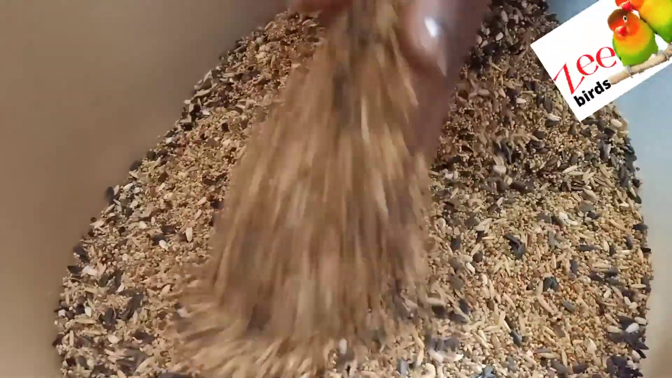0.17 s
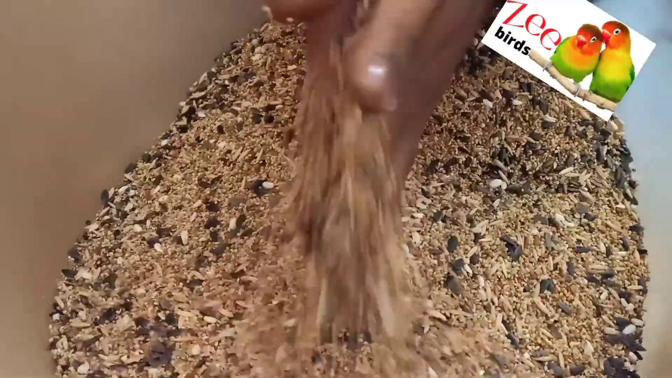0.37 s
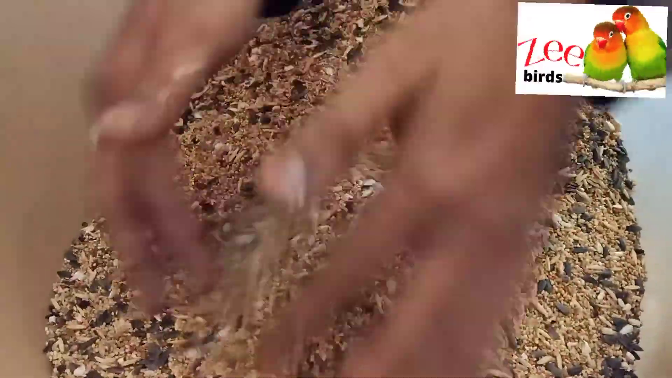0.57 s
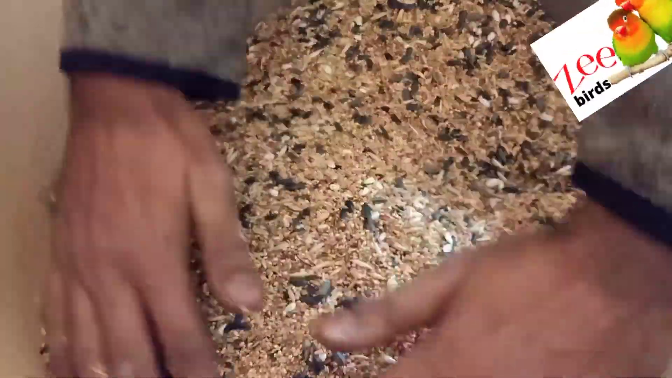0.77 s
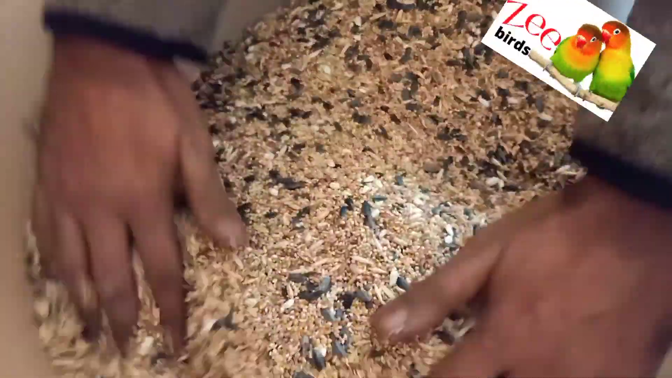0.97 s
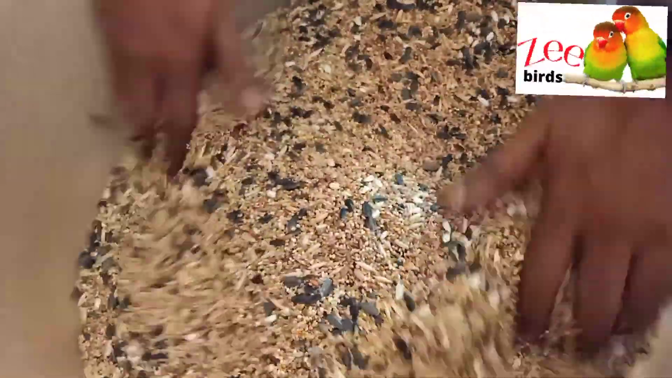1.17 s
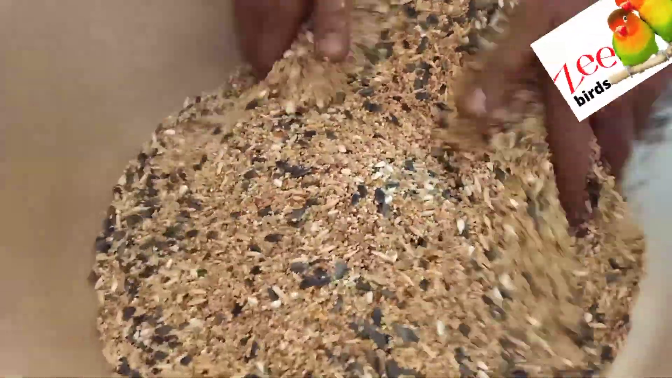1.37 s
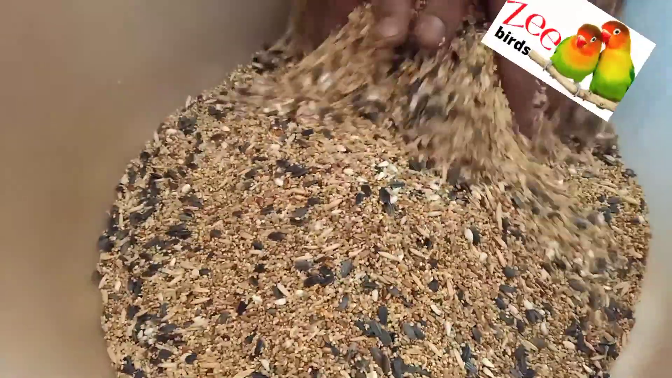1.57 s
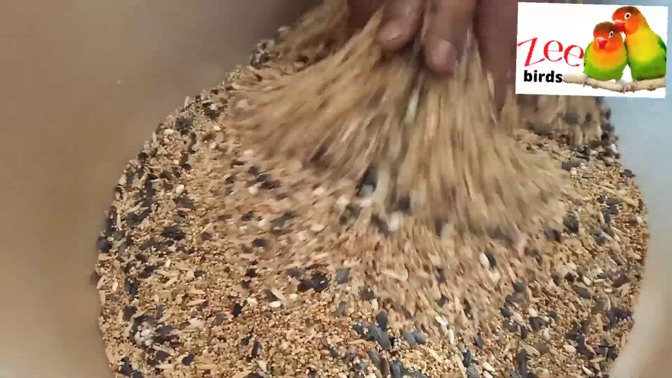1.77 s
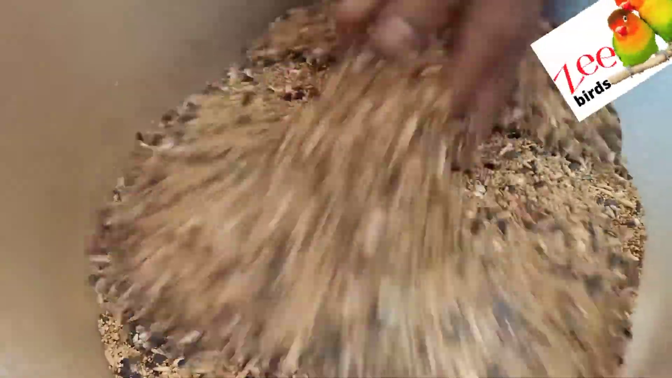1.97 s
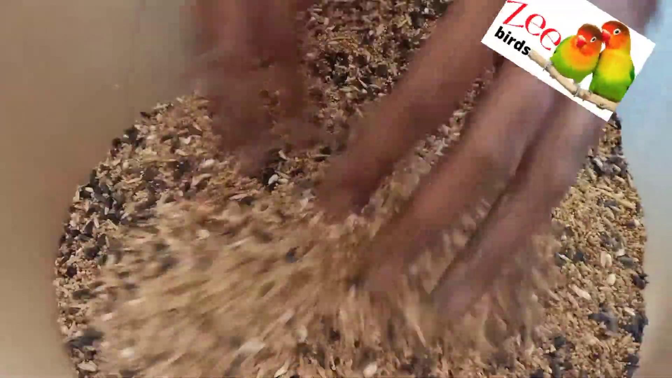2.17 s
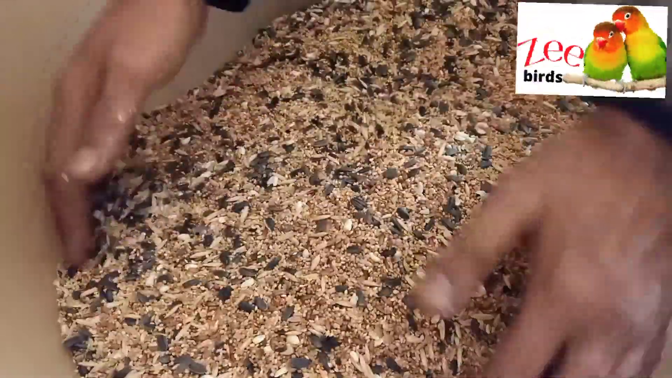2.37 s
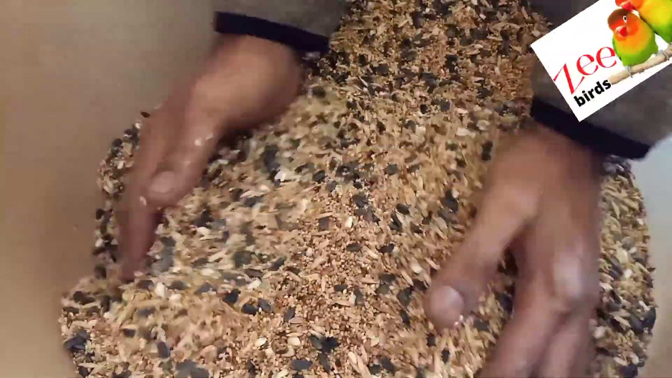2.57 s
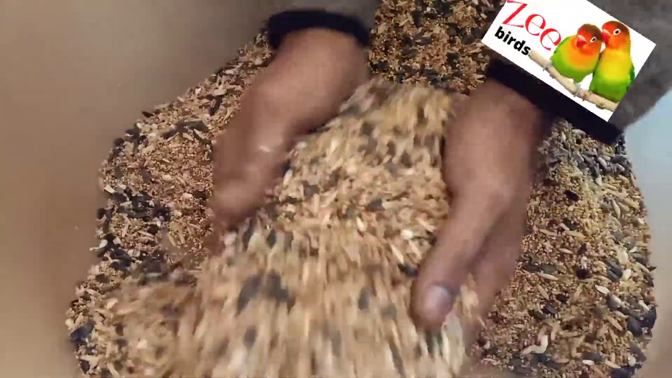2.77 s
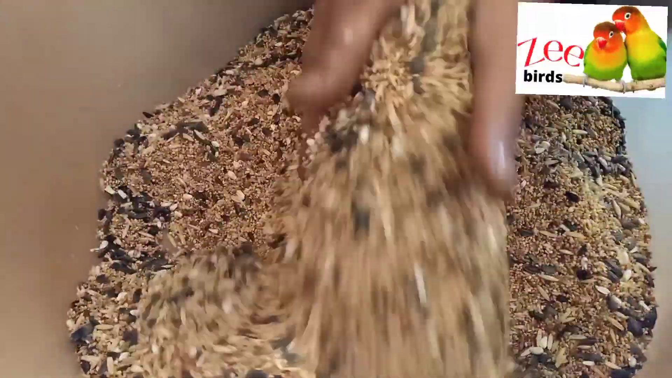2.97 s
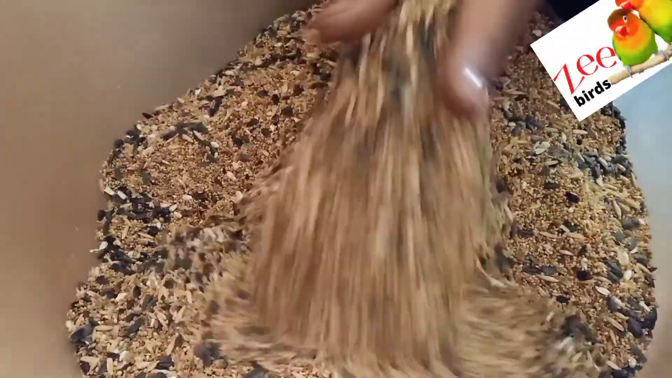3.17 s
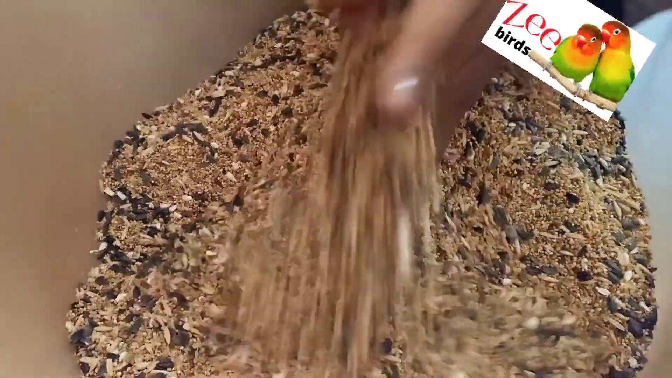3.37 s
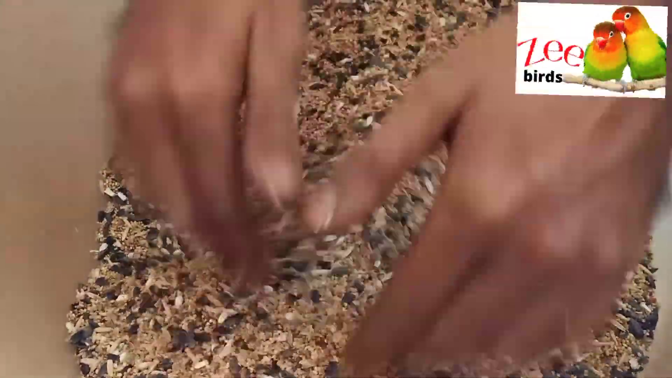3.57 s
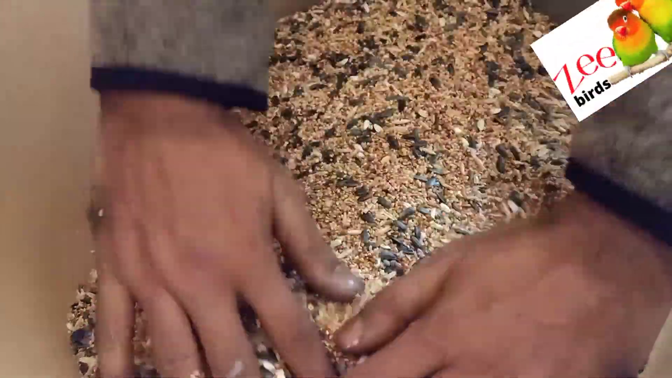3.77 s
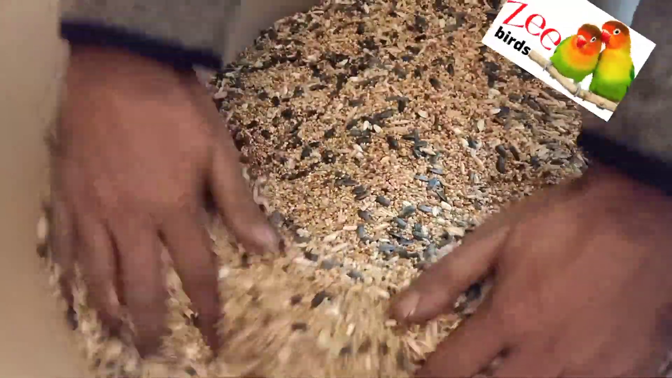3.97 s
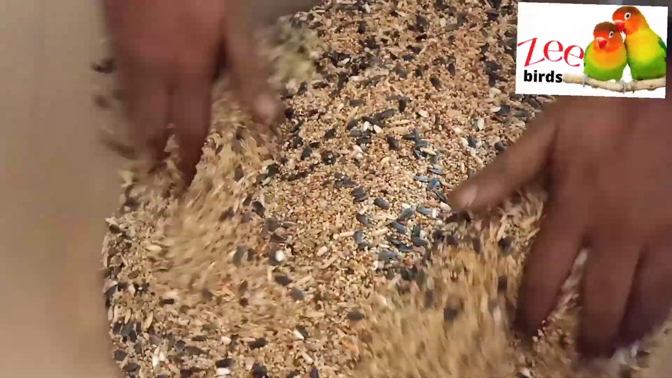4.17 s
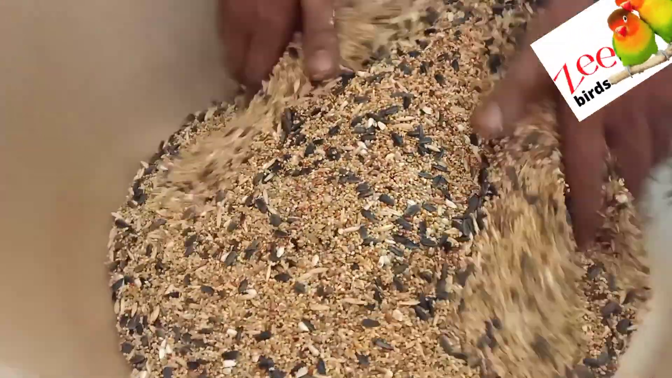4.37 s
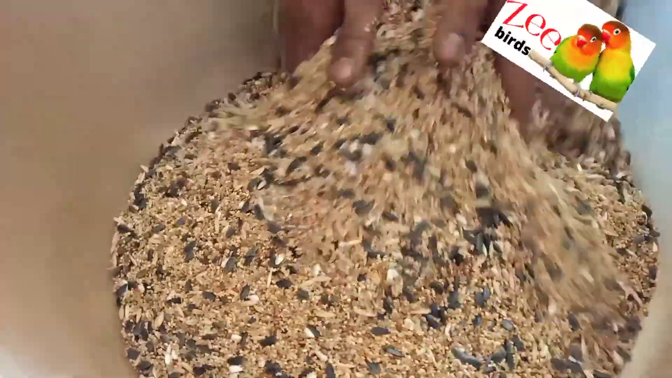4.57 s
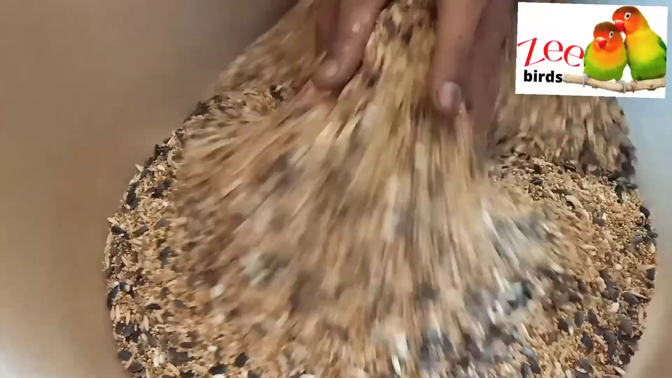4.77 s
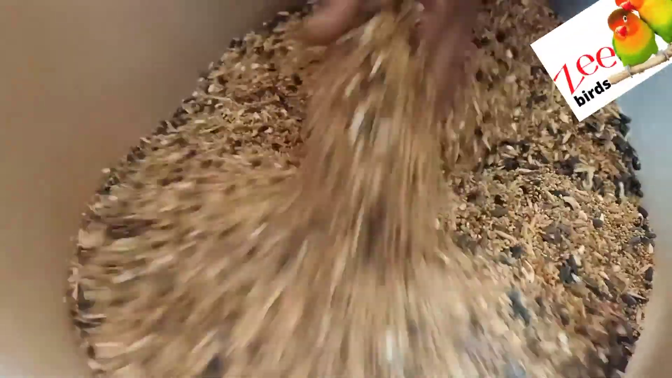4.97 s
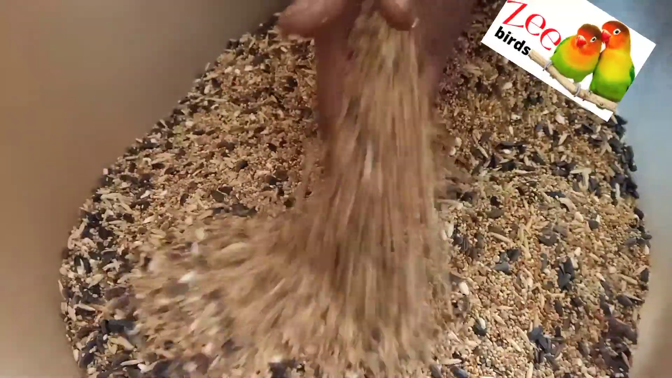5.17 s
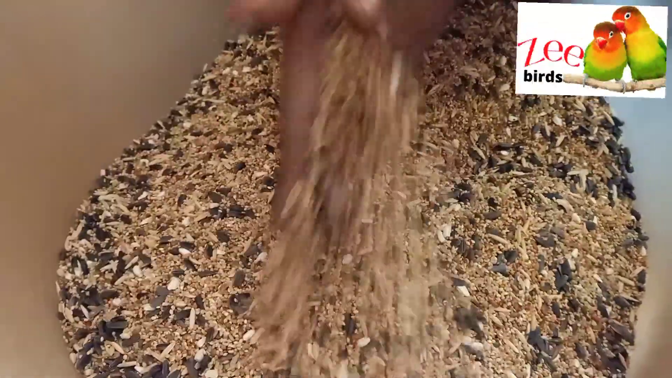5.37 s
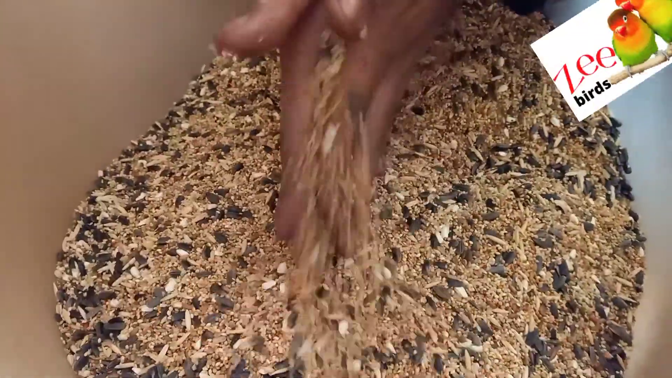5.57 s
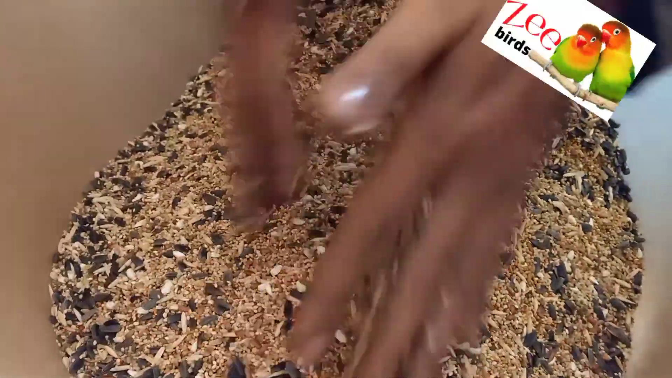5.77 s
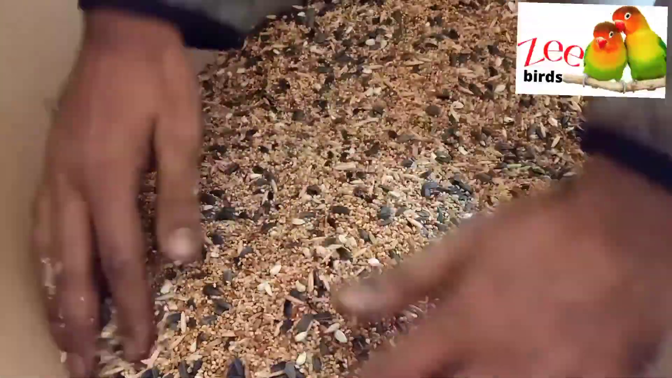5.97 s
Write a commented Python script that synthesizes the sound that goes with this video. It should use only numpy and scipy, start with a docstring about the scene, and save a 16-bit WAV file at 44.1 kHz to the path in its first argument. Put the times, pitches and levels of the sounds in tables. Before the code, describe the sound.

Small oily seeds are mixed by hand in a plastic tub, heard close up in a quiet room with a low hum. Three rounds of digging each begin with dull fingertip jabs, swell into a gritty crunch and end in a fine pattering pour. Husks swish over the palms, single seeds tick and clumps land with sharp clacks, while the tub adds a slight hollow ring.

```python
"""Scooping birdseed in a plastic tub

Two hands scoop oiled birdseed three times, close by. The fingers jab into the heap, plough
through it with a dense crunch, and lift a load that pours back in a fine patter; clumps drop
as the hands open. Crunch and patter are thousands of tiny clicks of single seeds.
The hollow tub rings and echoes, and a quiet room hums underneath."""
import sys
import numpy as np
from scipy import signal
from scipy.fft import rfft, irfft
from scipy.io import wavfile
from scipy.ndimage import uniform_filter1d

SR = 44100
rng = np.random.default_rng(int(sys.argv[2]) if len(sys.argv) > 2 else 0)


def transcribe(signal):
    """Save signal, clipped to [-1, 1], as a 16-bit WAV file at the path in sys.argv[1]."""
    frames = np.atleast_2d(signal).T
    limited = np.clip(frames, -1, 1)
    pcm = np.round(limited * 32767).astype(np.int16)
    wavfile.write(sys.argv[1], SR, pcm)


N = 264996
TIME = np.arange(N) / SR

# tone colour of a clump or a large seed striking the heap: frequency_hz, level_db
CLACK_COLOUR = [(200, -43), (750, -16), (1200, 2), (1700, 0), (2400, 4), (4500, -16.5), (6400, 1.5),
                (9500, -29.5), (15500, -32)]


def amp(db):
    """Turns decibels into a gain to multiply by."""
    return 10 ** (np.asarray(db) / 20)


def unit_power(x):
    """Scales a signal to an average power of one."""
    return x / np.sqrt(np.mean(x ** 2) + 1e-20)


def curve_at(points, hz):
    """Reads between the points of a curve of (frequency, value) pairs."""
    point_hz, value = np.transpose(points)
    return np.interp(np.log(hz + 1), np.log(point_hz + 1), value)


def add_at(mix, start_s, sound):
    """Adds a short sound to the mix at the given time."""
    part = mix[:, max(round(start_s * SR), 0):][:, :sound.shape[1]]
    part += sound[:, :part.shape[1]]


def coloured(x, colour, size=4096):
    """Gives a sound a tone colour. The filter never rings early, so clicks keep their sharp fronts."""
    log_gain = np.log(amp(curve_at(colour, abs(np.fft.fftfreq(size, 1 / SR)))))
    taps = np.fft.ifft(np.exp(signal.hilbert(log_gain).conj())).real[:size // 2]
    return signal.oaconvolve(x, taps[None], axes=1)[:, :x.shape[1]]


def brightened(x, bright_db, shares, patchy_db=0.35):
    """Moves the treble over time: each frequency takes its share of bright_db and wanders a little."""
    hz, t, spectrum = signal.stft(x, SR, nperseg=256)
    patches = uniform_filter1d(rng.standard_normal(spectrum.shape), size=3, axis=0)
    patches = unit_power(uniform_filter1d(patches, size=20, axis=1))
    change_db = curve_at(shares, hz)[:, None] * np.interp(t, TIME, bright_db) + patchy_db * patches
    return signal.istft(spectrum * amp(change_db), SR, nperseg=256)[1][:, :N]


def swell(peak_s, level_db, half_length_s):
    """The gain of a short movement: it rises and fades smoothly."""
    return amp(level_db) * np.exp(-np.minimum(((TIME - peak_s) / half_length_s) ** 2 / 2, 20))


def swelling_clicks(swells, colour, clicks):
    """Coloured clicks that rise and fade with each listed swell."""
    return sum(swell(*row) for row in swells) * unit_power(coloured(clicks, colour))


def held(start_s, length_s, rise_s, sag_db_per_s, stop_db_per_s):
    """The gain of a long movement: it rises, sags slowly, and dies away after length_s."""
    age = np.maximum(TIME - start_s, 0)
    fade_db = -sag_db_per_s * age - stop_db_per_s * np.maximum(age - length_s, 0)
    return np.minimum(age / rise_s, 1) * amp(fade_db)


def joined(movements):
    """Joins (gain, brightness) pairs: powers add, and the loudest counts most for the brightness."""
    power = sum(gain ** 2 for gain, _ in movements) + 1e-14
    return np.sqrt(power), sum(gain ** 2 * bright_db for gain, bright_db in movements) / power


def seed_clicks(per_s, spread_db, lag_s):
    """Clicks of single seeds; each lies elsewhere, so left and right hear it at different times."""
    chance = np.clip(per_s / SR, 1e-4, 1) * np.ones(N)
    size, place, side = rng.standard_normal((3, N))
    strength = rng.choice([-1, 1], N) * amp(spread_db * np.minimum(size, 2.5))
    clicks = strength * (rng.random(N) < chance) / np.sqrt(chance)
    right_arrival = (np.arange(N) + np.round(place * lag_s * SR).astype(int)) % N
    right = np.bincount(right_arrival, clicks * amp(-side), N)
    return unit_power(np.array([clicks * amp(side), right]))


def avalanches(rate_hz, depth_db):
    """Seeds give way in small slides: a random gain that moves up to about rate_hz times a second."""
    hz = np.fft.rfftfreq(N, 1 / SR)
    wander = irfft(rfft(rng.standard_normal(N)) / (1 + (hz / rate_hz) ** 2), N)
    return unit_power(amp(depth_db * unit_power(wander)))


def hum_and_hiss(hum_db=-70.5, hiss_db=-65.5, stereo_width=0.25):
    """The room's low steady noise, nearly the same on both sides, and each microphone's own hiss."""
    # tone colours of the room and of the hiss: frequency_hz, level_db
    hum_colour = [(20, -5), (36, -16), (50, 7), (68, -11), (95, 0), (135, 5), (200, 2.5), (250, -18),
                  (295, -6), (480, -9), (800, -9.5), (2000, -36)]
    hiss_colour = [(1000, -34), (4000, -17), (6300, -7), (9000, 26), (12000, 12), (15500, 31)]
    common, side = rng.standard_normal((2, N))
    noise = np.array([common + stereo_width * side, common - stereo_width * side])
    hum = unit_power(coloured(noise, hum_colour, size=16384))
    hiss = unit_power(coloured(rng.standard_normal((2, N)), hiss_colour))
    return amp(hum_db) * hum + amp(hiss_db) * hiss


def wall_echoes(x, decay_s=0.0053, patterns=24, change_s=0.05):
    """Quick treble echoes off the tub's walls; their pattern keeps changing as hands and seeds move."""
    t, out = np.arange(2048) / SR, np.zeros((2, N))
    for k in range(patterns):
        echoes = rng.standard_normal((2, len(t))) * (t > 0.0007) * np.exp(-t / decay_s)
        echoes = signal.lfilter(*signal.butter(2, 1000, "high", fs=SR), echoes)
        echoes /= np.linalg.norm(echoes, axis=1, keepdims=True)
        crossfade = np.sin(np.pi / 2 * np.minimum((TIME / change_s - k) % patterns, 2))
        out += signal.oaconvolve(x * crossfade, echoes, axes=1)[:, :N]
    return out


def tub(x, wall_db=-8, room_db=-17, room_fade_s=0.19):
    """The hollow tub rings, its walls echo, and the room adds a faint tail."""
    # the tub's hollow notes: pitch_hz, width_hz, boost_db
    notes = [(137.4, 8, 9.5), (290.8, 11, 9.5), (546, 16.4, 5.5), (761, 13, 7), (1280, 117, 1.5),
             (2390, 650, -1.5)]
    x = x + sum((amp(boost_db) - 1) * signal.lfilter(*signal.iirpeak(hz, hz / width_hz, SR), x)
                for hz, width_hz, boost_db in notes)
    t = np.arange(SR // 3) / SR
    tail = rng.standard_normal((2, len(t))) * amp(-60 * t / room_fade_s)
    room = signal.fftconvolve(x, tail / np.linalg.norm(tail[0]), axes=1)[:, :N]
    return x + amp(wall_db) * wall_echoes(x) + amp(room_db) * room


def shoving():
    """The whole heap shifts under the hands or a falling load, and the tub rumbles softly."""
    # shifts of the heap: peak_s, level_db, half_length_s
    shoves = [(0.02, -62, 0.02), (0.96, -54.5, 0.011), (2.41, -50.5, 0.014), (2.54, -58, 0.065),
              (2.78, -60, 0.016), (4.0, -58, 0.016)]
    # tone colour of the rumble: frequency_hz, level_db
    colour = [(25, -53), (70, 0), (100, -12), (150, 1), (200, 1.5), (300, -4), (450, -6), (1000, -40)]
    return swelling_clicks(shoves, colour, seed_clicks(per_s=2500, spread_db=7.5, lag_s=0.0001))


def sliding():
    """Husks skid over the oily palms in short bright swishes."""
    # seeds sliding off the skin: peak_s, level_db, half_length_s
    swishes = [(1.17, -39, 0.096), (1.43, -45, 0.08), (2.055, -40, 0.029), (2.135, -40.5, 0.023),
               (4.24, -44.5, 0.051), (4.925, -44.5, 0.04), (5.008, -33.5, 0.019)]
    # tone colour of a swish: frequency_hz, level_db
    colour = [(1000, -48), (2500, -2), (3600, 0), (5200, -1.5), (6200, 5.5), (7200, -4), (9000, -15),
              (15000, -26)]
    return swelling_clicks(swishes, colour, seed_clicks(per_s=9200, spread_db=7.5, lag_s=0.00025))


def pitched_rings():
    """Short rings in the seeds and hands: gliding scrapes, a clump's body, a jab's ring, a faint thump."""
    # rings: peak_s, level_db, half_length_s, pitch_hz, width_hz, glide_octaves_per_s
    rings = [(0.698, -43, 0.012, 1410, 890, 0), (1.095, -43, 0.071, 2520, 800, -0.8),
             (1.15, -55, 0.062, 783, 130, .4), (2.388, -45, 0.0094, 940, 454, 0),
             (2.607, -52.5, 0.1, 687, 169, 0.1), (2.588, -45, 0.018, 1860, 1300, 0),
             (2.716, -42, 0.051, 2340, 1250, -0.6), (2.925, -50.5, 0.029, 1340, 400, 0),
             (3.267, -49, 0.029, 6260, 400, 1), (3.993, -48, 0.086, 570, 506, -0.1),
             (4.042, -40.5, 0.051, 2240, 600, -.6), (4.425, -47.5, 0.087, 1900, 1610, -.4),
             (5.774, -64.5, 0.012, 750, 200, -0.1)]
    clicks, out = seed_clicks(per_s=6000, spread_db=5, lag_s=0.00025), np.zeros((2, N))
    for peak_s, level_db, half_length_s, pitch_hz, width_hz, glide in rings:
        near = abs(TIME - peak_s) < 5 * half_length_s
        gliding_hz = pitch_hz * 2 ** (glide * (TIME[near] - peak_s))
        tone = np.exp(2j * np.pi * np.cumsum(gliding_hz) / SR)
        # shift down, smooth, shift back: only the band round the pitch is left
        smooth = signal.butter(1, width_hz / 2, fs=SR)
        ring = tone * signal.lfilter(*smooth, signal.lfilter(*smooth, clicks[:, near] / tone))
        ring = signal.lfilter(*signal.butter(2, pitch_hz / 2, "high", fs=SR), ring.real)
        out[:, near] += swell(peak_s, level_db, half_length_s)[near] * unit_power(ring)
    return out


def stray_seeds(flow, gain_db=-11, flow_limit_db=-50):
    """Sunflower seeds tick out of the stream, drowned by a heavy pour; more drop as the palms rub."""
    # the palms rub together and shed the seeds stuck to them: peak_s, level_db, half_length_s
    rubs = [(0.42, -64.5, 0.13), (3.66, -60, 0.23), (5.5, -55, 0.14), (5.8, -65, 0.038)]
    ticks = coloured(seed_clicks(per_s=110, spread_db=8, lag_s=0.0003), CLACK_COLOUR)
    shed = swelling_clicks(rubs, CLACK_COLOUR, seed_clicks(per_s=400, spread_db=2, lag_s=0.00033))
    return amp(gain_db) * np.minimum(flow, amp(flow_limit_db)) * unit_power(ticks) + shed


def clumps(scatter_s=0.002):
    """A lump of oily seeds bursts on the heap: a puff of noise that dies at once."""
    # the largest clumps landing: start_s, peak_db, brightness_db_per_octave
    landings = [(0.385, -38.5, 0), (0.6855, -31, -3), (0.6962, -24.5, 0), (2.121, -25, 4), (2.133, -27, 5),
                (2.147, -32, 1), (2.158, -28, 1), (2.242, -34, -4.5), (2.367, -25, -2), (2.417, -28, 1),
                (2.43, -37, 1), (2.439, -33, -2), (2.5652, -32, 0), (2.911, -31, 7), (2.931, -29.5, -4),
                (3.507, -33.5, -0.5), (4.981, -21, 8), (5.002, -20, 5), (5.015, -21.5, 9), (5.363, -43, -3),
                (5.431, -38, -5), (5.485, -39.5, 1), (5.53, -39, -5.5), (5.604, -41, -1), (5.671, -35.5, 4),
                (5.8997, -33, -4), (5.927, -31.5, -3), (5.948, -35, 0), (5.955, -23.5, -1.5),
                (5.971, -37, 1), (5.983, -29.5, -4.5), (5.992, -31, 1), (6.004, -27.5, 1)]
    out, t = np.zeros((2, N)), np.arange(2048) / SR
    for start_s, peak_db, db_per_octave in landings:
        colour = [(hz, db + db_per_octave * np.log2(hz / 1000)) for hz, db in CLACK_COLOUR]
        burst = coloured(rng.standard_normal((2, len(t))) * np.exp(-t / scatter_s), colour)
        add_at(out, start_s, amp(peak_db) * burst / abs(burst).max())
    return out


def trickle_flow():
    """Flow and brightness of thin streams: each opens, thins as the hands empty, and stops."""
    # streams between the lifted fingers: start_s, length_s, flow_db, brightness_db
    trickles = [(-0.05, 0.8, -60.5, 12.5), (1.703, 0.52, -48.5, -9), (3.059, 0.54, -57, 11.5),
                (4.788, 0.48, -60, 10), (5.204, 0.5, -60.5, 9)]
    streams = []
    for start_s, length_s, flow_db, bright_db in trickles:
        shape = held(start_s, length_s, rise_s=0.15, sag_db_per_s=4, stop_db_per_s=76.5)
        streams.append((amp(flow_db) * shape, bright_db))
    return joined(streams)


def gush_flow(run_out_power=1.69, last_seed_s=0.14):
    """Flow and brightness of handfuls: each swells, drops, and leaves a tail of late seeds."""
    # handfuls let go at once: peak_s, flow_db, rise_s, run_out_s, brightness_db
    gushes = [(0.003, -26.5, 0.013, 0.047, -9), (0.699, -39, 0.013, 0.037, -7), (2.04, -50, 0.031, 0.14, 7),
              (2.152, -38.5, 0.047, 0.049, -5), (2.309, -49, 0.006, 0.13, 1),
              (2.366, -42.5, 0.0074, 0.034, -10), (2.932, -41, 0.047, 0.035, -14),
              (3.091, -48.5, 0.34, 0.27, -12.5), (5.02, -34, 0.028, 0.07, -10),
              (5.511, -58, 0.1, 0.32, 6.5), (5.891, -50, 0.045, 0.061, 2), (6.005, -45, 0.056, 0.058, -3.5)]
    handfuls = []
    for peak_s, flow_db, rise_s, run_out_s, bright_db in gushes:
        before, after = np.maximum(peak_s - TIME, 0), np.maximum(TIME - peak_s, 0)
        shape = np.exp(-before / rise_s - (after / last_seed_s) ** 2)
        shape /= (1 + after / run_out_s) ** run_out_power
        handfuls.append((amp(flow_db) * shape, bright_db))
    return joined(handfuls)


def pouring(flow, bright_db, gain_db=4, neutral_db=4.5, trickle_db=-55, trickle_per_s=3500):
    """Loose seeds land, more of them as the flow grows; big ones tick over a wash of fine millet."""
    # tone colour of seeds landing on the heap: frequency_hz, level_db
    colour = [(150, -32), (300, -20.5), (600, -11), (930, -7), (1100, -0.5), (1650, -2.5), (2400, 2.5),
              (3500, 0), (4600, -4), (6300, 3), (7300, 2.5), (9500, -10.5), (12000, -12), (15500, -4.5)]
    big_seeds = seed_clicks(per_s=trickle_per_s * flow / amp(trickle_db), spread_db=3, lag_s=0.00035)
    big_seeds *= avalanches(rate_hz=68.5, depth_db=1.5)
    millet = 0.92 * seed_clicks(per_s=30000, spread_db=-1, lag_s=0.00035)
    patter = amp(gain_db) * flow * unit_power(coloured(big_seeds + millet, colour))
    treble_shares = [(2500, 0.046), (4000, 0.39), (6000, 0.46), (11000, 0.81)]
    return brightened(patter, bright_db - neutral_db, treble_shares)


def knock(t, pitch_hz, ring_s):
    """A note pushed by soft flesh: it builds up over ring_s and dies within a few cycles."""
    return np.sin(2 * np.pi * pitch_hz * t) * t / ring_s * np.exp(1 - t / ring_s)


def jabs(gain_db=-0.5, overtone_ratio=1.66, overtone_db=-9, grit_s=0.0064, grit_width_hz=2200):
    """A fingertip stops in the heap: a knock, its overtone, a low thump, and grit shifting round it."""
    # fingertips jabbing in: start_s, level_db, pitch_hz, ring_s, thump_db
    fingertips = [(0.755, -27, 1170, 0.00075, -10), (0.776, -36.5, 1080, .0006, -7),
                  (0.7944, -34, 1170, 0.00087, -9), (0.821, -29.5, 1030, 0.00085, -9),
                  (0.829, -34.5, 1010, 0.00092, -9), (2.381, -24.5, 920, 0.00075, -35),
                  (2.391, -24, 970, 0.0007, -25), (2.4055, -30, 780, 0.0017, -22),
                  (2.415, -31, 856, 0.0011, -23), (2.5655, -29, 1400, 0.00028, -24),
                  (2.596, -36, 680, 0.0026, -13), (3.77, -32, 1300, .0006, -10),
                  (3.7797, -25.5, 1170, 0.00066, -9)]
    # tone colour of a jab: frequency_hz, level_db
    colour = [(50, -44), (150, -4), (350, 8.5), (800, 6), (2200, 3.5), (3600, 3), (6300, -0.5), (9000, -41),
              (15500, -38)]
    out, t = np.zeros((2, N)), np.arange(2048) / SR
    age = np.maximum([t, t - 0.00012], 0)  # the left side hears it first
    for start_s, level_db, pitch_hz, ring_s, thump_db in fingertips:
        overtone = amp(overtone_db) * knock(age, overtone_ratio * pitch_hz, ring_s)
        thump = amp(thump_db) * knock(age, pitch_hz=470, ring_s=0.0013)
        blow = knock(age, pitch_hz, ring_s) - overtone - thump
        grit = (rng.standard_normal(len(t)) + rng.standard_normal((2, len(t)))) * np.exp(-t / grit_s)
        band_hz = [pitch_hz / 2, pitch_hz / 2 + grit_width_hz]
        grit = signal.lfilter(*signal.butter(1, band_hz, "band", fs=SR), grit)
        thud = coloured(blow + 0.85 * grit, colour)
        add_at(out, start_s, amp(level_db + gain_db) * thud / abs(thud.mean(0)).max())
    return out


def crunch_strength(speed_skew=0.7, slow_dull_db=12):
    """Gain and brightness of short dull crunches, and of scoops that are brightest when fastest."""
    # palms pressing, or the lifted load shifting and landing:
    # peak_s, level_db, half_length_s, brightness_db
    short_crunches = [(0.784, -52, 0.031, -13), (0.866, -53, 0.033, 7.5), (2.434, -48, 0.032, 2.5),
                      (3.07, -64, 0.12, 4), (3.824, -49.5, 0.039, 1)]
    # hands ploughing through the heap: start_s, length_s, push_db, full_speed_brightness_db
    scoops = [(0.845, 0.95, -42.5, 6), (2.423, 0.35, -49, 6), (3.832, 0.97, -43.5, 11)]
    movements = [(swell(*row), bright_db) for *row, bright_db in short_crunches]
    for start_s, length_s, push_db, bright_db in scoops:
        progress = np.clip((TIME - start_s) / length_s, 0, 1)
        speed = np.sin(np.pi * progress ** speed_skew)  # one arch that peaks early
        # the scoop bites in, eases as the seeds give way, and dies as the hands lift out
        push = amp(push_db) * held(start_s, length_s, rise_s=0.17, sag_db_per_s=8, stop_db_per_s=79)
        movements.append((push, bright_db - slow_dull_db * (1 - speed)))
    return joined(movements)


def ploughing(gain_db=9, neutral_db=8.5):
    """Thousands of packed seeds slip past each other; the crunch dulls as the hands sink and slow."""
    # tone colour of crunching seeds: frequency_hz, level_db
    colour = [(60, -29), (150, -20.5), (235, -17.5), (290, -11), (430, -7), (800, -4), (1650, -5),
              (2300, 1), (4600, -8.5), (6300, -1.5), (7200, -4), (9500, -22), (12000, -22.5),
              (15500, -16.5)]
    strength, bright_db = crunch_strength()
    slips = seed_clicks(per_s=6000, spread_db=2.5, lag_s=0.00025)
    slips *= avalanches(rate_hz=21.8, depth_db=0.95)
    crunch = amp(gain_db) * strength * unit_power(coloured(slips, colour))
    treble_shares = [(700, 0), (1300, 0.092), (2400, 0.39), (4500, 0.85), (7000, 0.79), (14000, 0.98)]
    return brightened(crunch, bright_db - neutral_db, treble_shares)


def scene():
    """Digging hands and falling seeds sound in the tub, over the room's hum."""
    trickle, trickle_bright_db = trickle_flow()
    gush, gush_bright_db = gush_flow()
    digging = jabs() + ploughing() + pitched_rings() + shoving()
    falling = pouring(trickle, trickle_bright_db) + pouring(gush, gush_bright_db)
    falling = falling + sliding() + clumps() + stray_seeds(np.hypot(trickle, gush))
    return tub(digging + falling) + hum_and_hiss()


def record(dry, top_hz=15600):
    """The left microphone's opening rings just above 6 kHz; both sides lose the highest treble."""
    # tone colour of the left opening compared with the right: frequency_hz, boost_db
    left_colour = [(100, .3), (300, 2), (750, 1), (1150, 4), (2000, 2.7), (3300, 2.7), (5000, 6.5),
                   (5850, 4.5), (6230, 7.5), (6460, -3), (7500, -3.5), (9000, 0), (11000, 1), (15000, -1.2)]
    both_sides = np.vstack([coloured(dry[:1], left_colour), dry[1:]])
    treble_cut = signal.firwin(511, top_hz, window=("kaiser", 9), fs=SR)
    return signal.oaconvolve(both_sides, treble_cut[None], "same")


dry = scene()
out = record(dry)
transcribe(out)
```